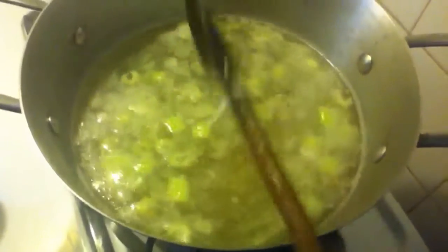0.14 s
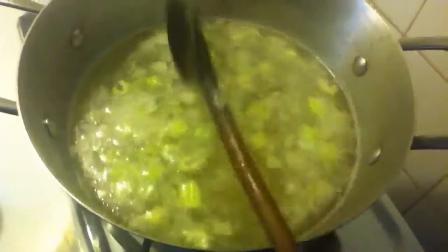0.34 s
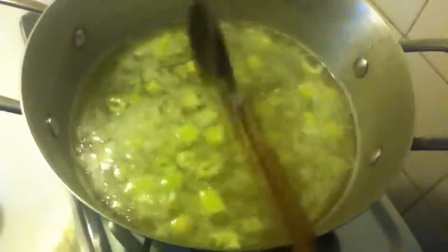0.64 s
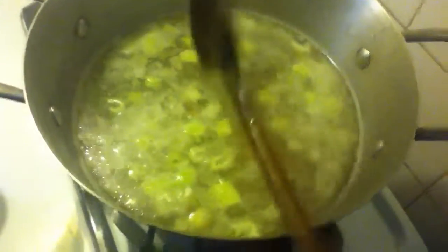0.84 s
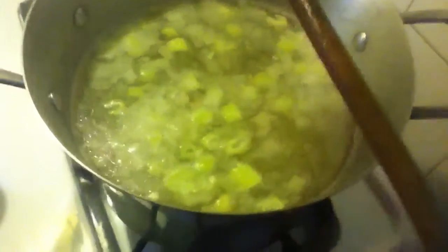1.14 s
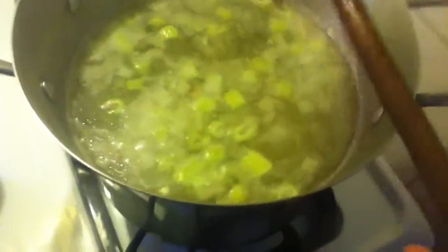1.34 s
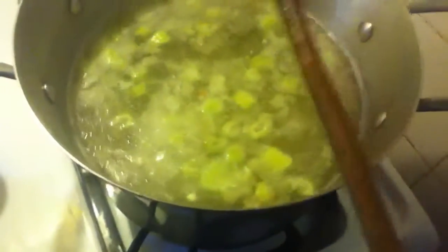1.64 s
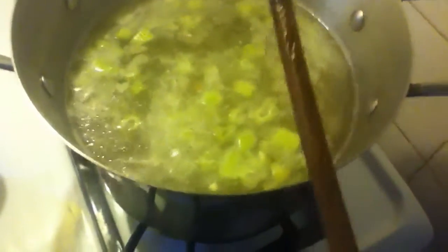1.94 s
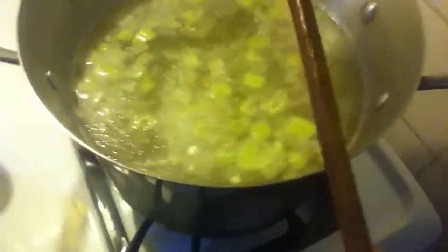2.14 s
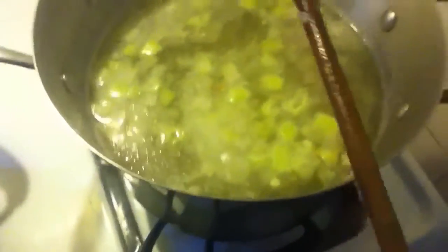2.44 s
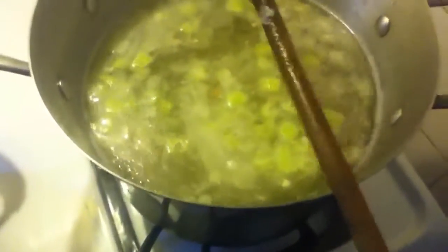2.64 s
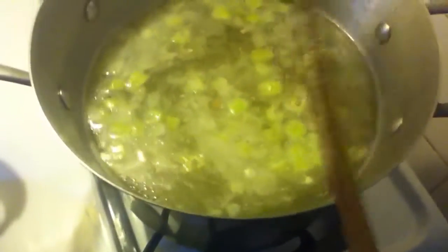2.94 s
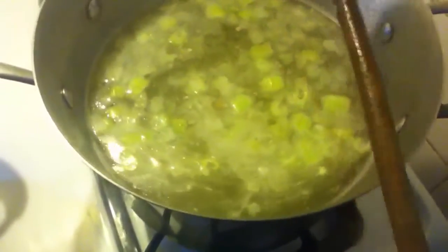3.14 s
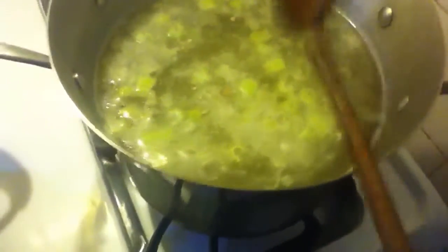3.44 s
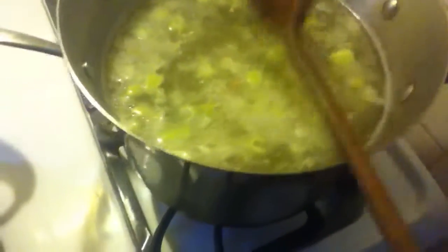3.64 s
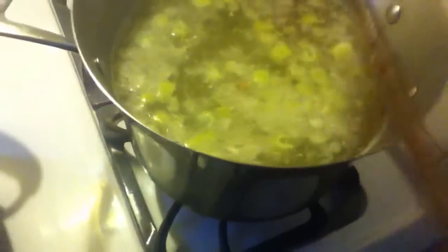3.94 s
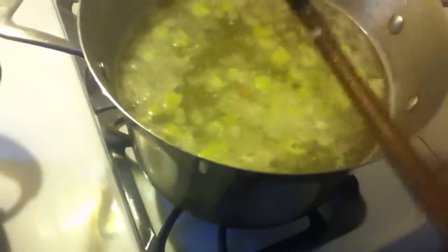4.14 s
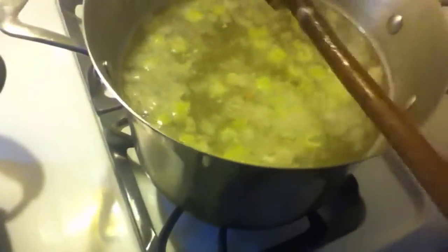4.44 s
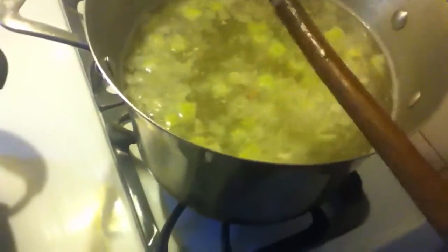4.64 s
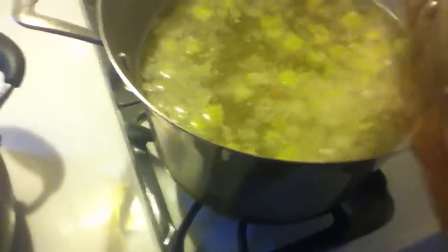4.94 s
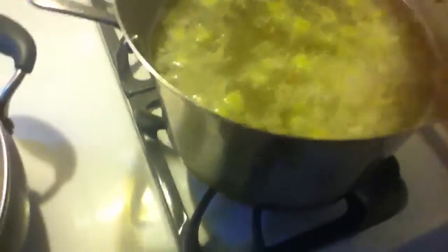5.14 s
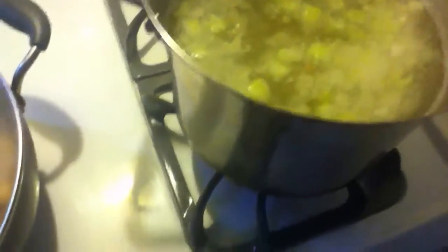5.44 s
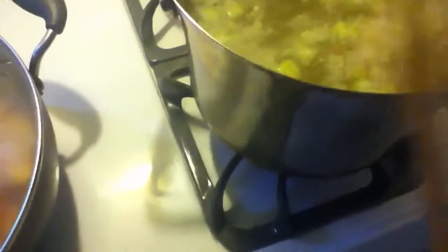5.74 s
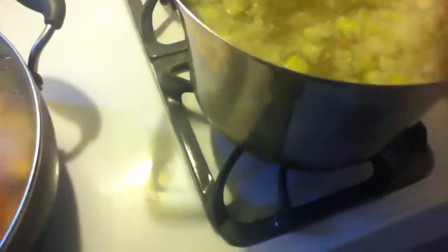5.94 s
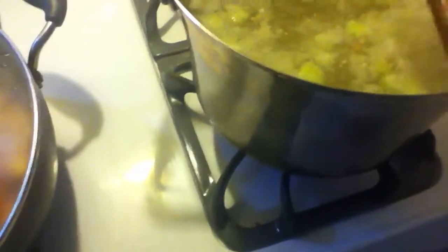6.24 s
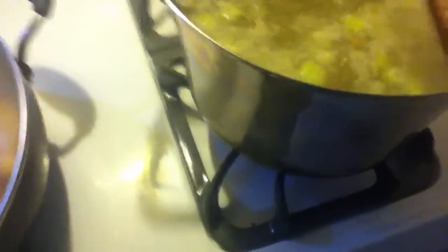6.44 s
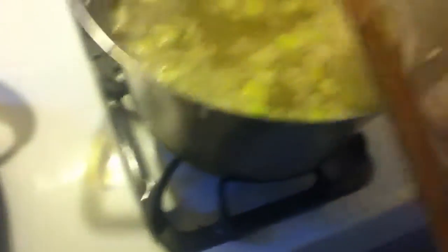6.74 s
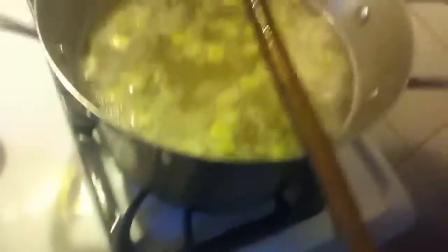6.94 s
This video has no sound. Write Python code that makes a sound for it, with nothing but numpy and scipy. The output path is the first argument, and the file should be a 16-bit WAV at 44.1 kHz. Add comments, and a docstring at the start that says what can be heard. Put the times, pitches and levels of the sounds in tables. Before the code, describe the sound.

A pot of thick soup simmers quietly throughout, a dense low bubbling with burner rush and fine fizz, heard very close in a small echoing kitchen. From about 0.2 to 1.0 seconds a wooden spoon raps the metal rim five times, evenly and hard: bright snap, woody clack, short damped clank, then shuddering grate and a deep stove boom. The third rattles most, the fourth is softer. The boil sags under the blows, then rebuilds; hollow plops come near 2.4 and 2.6 seconds, a tiny spit hiss at 3.2. Three more knocks land at 3.5, 3.7 and 3.9, the middle one rattling, with a light second touch after the last. Bubbling returns, with plops around 4.7 and 5.1. Four final knocks run from 5.6 to 6.2, starting weaker, brighter in ring, growing stronger, the third rattling. The boom fades into simmering and a plop near 6.5. Loud blows flatten with overload.

```python
"""A wooden spoon is knocked clean on the rim of a metal saucepan in three bursts: decaying modes ring the
soup-damped wall, noise bursts snap, clack, rattle and shudder, and narrow noise bands boom the stove top.
Thick soup simmers underneath: many gliding sine bubbles, a noise rush and fizz sag at each blow and rebuild.
Bigger bubbles plop, spits hiss and the pan rocks on its grate; a small kitchen adds diffuse echoes.
The microphone is close, and the blows overload it."""
import sys
import numpy as np
from scipy import signal
from scipy.fft import rfft, irfft
from scipy.io import wavfile
from scipy.ndimage import uniform_filter1d

SR = 44100
rng = np.random.default_rng(int(sys.argv[2]) if len(sys.argv) > 2 else 0)


def log_audio(samples):
    """Write samples as a 16-bit WAV file to the path given in sys.argv[1]."""
    # one column per channel
    frames = np.atleast_2d(samples).T
    # limit to full scale, then quantise
    limited = np.clip(frames, -1, 1)
    pcm = np.round(limited * 32767).astype(np.int16)
    wavfile.write(sys.argv[1], SR, pcm)


N = 313330
TIME = np.arange(N) / SR
RING = TIME[:SR]  # one second, the longest any single sound lasts


def undb(db):
    """Decibels to gain."""
    return 10 ** (np.asarray(db) / 20)


def unit(x):
    """Scale to a standard deviation of 1."""
    return x / np.std(x)


def fade(t60):
    """Exponential decay that falls 60 dB in t60 seconds, cut off at one second."""
    return np.exp(-np.log(1000) * RING / t60)


def add(track, s, sound):
    """Mix a sound in at time s."""
    i = max(int(s * SR), 0)
    track[i:i + len(sound)] += sound[:max(N - i, 0)]


def colour(x, points):
    """Causal minimum-phase filter through (f/Hz, level/dB) points; white noise keeps its power."""
    hz, db = np.transpose(points)
    size = 4096
    bins_hz = np.arange(size // 2 + 1) * SR / size
    gain = undb(np.interp(np.log(bins_hz + 1), np.log(hz), db))
    # folding the cepstrum to one side makes the response causal
    cepstrum = irfft(np.log(gain))[:size // 2]
    response = irfft(np.exp(rfft(np.r_[cepstrum[0], 2 * cepstrum[1:]], size)))
    return signal.fftconvolve(x, response / np.linalg.norm(response))[:len(x)]


def band(hz, width):
    """One second of noise gathered round a resonance, rms 1."""
    f = np.arange(SR // 2 + 1)
    noise = rfft(rng.standard_normal(SR))
    return unit(irfft(noise / (1 + ((f - hz) / width) ** 2) ** 1.66, SR))


def burst(t60, points):
    """A dense crowd of short modes: coloured noise that dies away."""
    return colour(rng.standard_normal(SR) * fade(t60), points)


def walk(rate):
    """A bounded random wander with a spread near 1, heading for a new value rate times a second."""
    step = int(SR / rate)
    targets = rng.uniform(-1.1, 1, N // step + 1)
    return 2 * uniform_filter1d(np.repeat(targets, step), step)[:N]


def sprinkle(per_s):
    """Random events: rows of (t/s, size 0-1, pitch 0-1)."""
    return rng.random((int(per_s * N / SR), 3)) * [N / SR, 1, 1]


# kitchen echoes by frequency: (f/Hz, level/dB, t60/s)
ROOM_DECAY = [(100, -12, 0.74), (300, 1, 0.62), (700, -4.5, 0.75), (1370, -8.5, 0.43), (2220, -16.5, 0.38),
              (4500, -11.5, 0.37), (8000, -14, 0.36), (15000, -19, 0.3)]


def kitchen_echoes(x, first_s=0.0088, build_s=0.003):
    """Diffuse echoes off hard walls: each frequency region of a noise response dies at its own rate."""
    hz, db, t60 = np.transpose(ROOM_DECAY)
    noise = rfft(rng.standard_normal(SR))
    log_hz = np.log(np.arange(len(noise)) + 1)
    onset = 1 - np.exp(-np.maximum(RING - first_s, 0) / build_s)
    response = 0
    for share, level_db, decay in zip(np.eye(len(hz)), db, t60):
        shape = onset * fade(decay)
        region = irfft(noise * np.interp(log_hz, np.log(hz), share), SR)
        response = response + undb(level_db) * region * shape / np.linalg.norm(shape)
    return signal.fftconvolve(x, response)[:len(x)]


REBUILD_S = 0.9  # time constant of the boil's return after a blow


def shaken(s):
    """How far the boil is knocked back at time s: 1 at a blow, easing to 0 as new bubbles grow."""
    return np.max([(s >= blow) * np.exp(-np.abs(s - blow) / REBUILD_S) for blow, *_ in BLOWS], axis=0)


# tone of simmer and burner: (f/Hz, relative level per Hz/dB)
SIMMER_TONE = [(15, -74), (25, -20), (123, -3), (175, -10.5), (285, -2.5), (326, -9.5), (531, -5.5),
               (962, -15), (1290, -11.5), (2690, -21), (7920, -25), (16000, -34)]
# resonances of the air in the pan above the soup: (f/Hz, width/Hz, gain/dB)
PAN_AIR = [(224, 21, 1.5), (291, 14, -2), (383, 14.5, 3.5), (544, 100, -6.5), (758, 31, 4), (880, 73, -5),
           (1140, 86, -4.5), (1677, 22, 4), (2280, 100, -6), (6020, 410, -6)]


def hollow(x):
    """The air in the pan adds its resonances to sounds from the soup; rms 1."""
    x = colour(x, SIMMER_TONE)
    air = 0
    for hz, width, db in PAN_AIR:
        air = air + undb(db) * signal.lfilter(*signal.iirpeak(hz, hz / width, fs=SR), x)
    return unit(x + air)


def bubble(hz, cycles, glide=0.15):
    """A bubble rings for some cycles, rising in pitch by the glide fraction as it opens."""
    age = np.linspace(0, 1, int(SR * cycles / hz) + 2)
    envelope = np.exp(-np.log(1000) * age) * (1 - np.exp(-age * cycles))
    return envelope * np.sin(2 * np.pi * cycles * age * (1 + glide * age / 2))


# undisturbed level of bubbling and fizz, and how far a blow makes each sag (dB)
BUBBLING_DB, FIZZ_DB = -45.5, -49.5
BUBBLING_SAG_DB, FIZZ_SAG_DB = 7, 8


def soup_bubbles(per_s=450, size_db=2.5):
    """Small bubbles open at random in the thick soup, each a short gliding ring."""
    out = np.zeros(N)
    for when, pitch, size, length in rng.random((int(per_s * N / SR), 4)):
        hz = 230 * 9 ** pitch
        size_gain = undb(size_db * min(-np.log(1 - size), 3.5))
        add(out, when * N / SR, bubble(hz, 6 + 14 * length) * hz * size_gain)
    return out


def wall_pops(per_s=900, pop_db=2.0):
    """Tiny bubbles pop along the hot wall as single random clicks."""
    size_gain = undb(pop_db * np.minimum(rng.exponential(size=N), 4))
    return (rng.random(N) < per_s / SR) * rng.standard_normal(N) * size_gain


def simmer(rush_db=10, crackle_db=-5, split_hz=2200, flutter_db=0.8, gurgle_db=1.7):
    """Bunched bubbles over the burner's noise rush below the split; pops and hiss fizz above it."""
    sag = shaken(TIME)
    boil_gain = undb(BUBBLING_DB - BUBBLING_SAG_DB * sag)
    fizz_gain = undb(FIZZ_DB - FIZZ_SAG_DB * sag) * undb(flutter_db * walk(25))
    bunches = undb(gurgle_db * walk(10))  # bubbles come up in bunches
    rush, hiss = rng.standard_normal((2, N))
    boil = unit(soup_bubbles() * bunches) + undb(rush_db) * rush
    fizz = undb(crackle_db) * unit(wall_pops()) + hiss
    low = signal.sosfilt(signal.butter(2, split_hz, fs=SR, output="sos"), boil)
    high = signal.sosfilt(signal.butter(2, split_hz, "high", fs=SR, output="sos"), fizz)
    return boil_gain * hollow(low) + fizz_gain * hollow(high)


# random spits: rate (per s), mid level before the sag (dB), middle pitch (Hz), length (s)
SPITS_PER_S, SPIT_DB, SPIT_HZ, SPIT_S = 3.8, -51.5, 6800, 0.029
# spits at set times: (t/s, level/dB, centre f/Hz, length/s)
SET_SPITS = [(1.474, -54, 9500, 0.032), (3.198, -47.5, 8000, 0.031)]


def spits(spread_db=6):
    """Drops of soup hiss away on the hot wall: noise bands that swell and vanish; random ones sag with blows."""
    out = np.zeros(N)
    scattered = []
    for s, size, pitch in sprinkle(SPITS_PER_S):
        db = SPIT_DB - FIZZ_SAG_DB * shaken(s) + spread_db * (size - .5)
        scattered.append((s, db, SPIT_HZ * 2 ** (pitch - .5), SPIT_S))
    for s, db, hz, length in SET_SPITS + scattered:
        swell = np.exp(-(2 * (RING - length) / length) ** 2)  # the peak falls at time s
        add(out, s - length, undb(db) * band(hz, hz / 2) * swell)
    return out


# random plops: rate (per s), mid level before the sag (dB)
PLOPS_PER_S, PLOP_DB = 5.4, -37
# their lowest pitch (Hz), range of pitch (octaves), cycles of ring
PLOP_LOW_HZ, PLOP_OCTAVES, PLOP_CYCLES = 322, 1.98, 16
# big bubbles bursting at set times: (t/s, level/dB, f/Hz, ring/cycles)
SET_PLOPS = [(2.391, -30.5, 1290, 50), (2.394, -28, 510, 8.7), (2.59, -35, 556, 39), (2.618, -33, 1050, 17),
             (3.293, -32.5, 515, 34), (4.735, -34, 1880, 31), (5.088, -30.5, 420, 14),
             (5.145, -29.5, 590, 9.6), (6.475, -33, 815, 20)]


def plops(plop_db=0, skin_db=-12, skin_t60=0.034, spread_db=6):
    """A big bubble tears its skin (noise) and its hollow rings (sine); random ones sag with blows."""
    out = np.zeros(N)
    scattered = []
    for s, size, pitch in sprinkle(PLOPS_PER_S):
        db = PLOP_DB - BUBBLING_SAG_DB * shaken(s) + spread_db * (size - .5)
        scattered.append((s, db, PLOP_LOW_HZ * 2 ** (PLOP_OCTAVES * pitch), PLOP_CYCLES))
    for s, db, hz, cycles in SET_PLOPS + scattered:
        add(out, s, undb(db + plop_db) * bubble(hz, cycles, glide=0.031))
        add(out, s, undb(db + skin_db) * band(hz, 3.0 * hz) * fade(skin_t60))
    return out


# time between landings of the rocking pan (s), mean loss per landing (dB)
ROCK_S, ROCK_LOSS_DB = .049, 2.5


def settles(thud_db=-36, thud_t60=0.13, tick_db=-43, tick_t60=0.12, uneven_db=3, count=3):
    """After each blow the pan rocks and lands a few times, softer on average, with a thud and a short tick in
    the wood's tone."""
    out = np.zeros(N)
    thud_tone = [(35, -15), (120, 1.0), (500, -21), (1300, -9.0), (4000, -46)]
    for s, db, _, boom_db, *_ in BLOWS:
        for k, chance in enumerate(rng.standard_normal(count)):
            thud = undb(thud_db + boom_db) * burst(thud_t60, thud_tone)
            tick = undb(tick_db) * burst(tick_t60, WOOD_TONE)
            landing_db = db - k * ROCK_LOSS_DB + uneven_db * chance
            add(out, s + (k + 1) * ROCK_S, undb(landing_db) * (thud + tick))
    return out


# lingering clusters of close modes in stove top and pan: (f/Hz, width/Hz, t60/s, relative level/dB)
STOVE_MODES = [(95, 41, 0.53, -40), (127.4, 23.5, 1.6, -38.5), (150, 12, 0.58, -44.5),
               (255, 38, 0.44, -43.5), (357, 21, 0.88, -44.5), (418, 50, 0.7, -38), (609, 8.3, 1.44, -50),
               (899, 31, 0.46, -36), (1063, 40, 0.58, -40), (2375, 27, 0.32, -35)]


def stove(swell_s=0.0025):
    """The stove top takes up a push through the grate and booms along with the pan; close modes beat."""
    boom = sum(undb(db) * band(hz, width) * fade(t60) for hz, width, t60, db in STOVE_MODES)
    return boom * (1 - np.exp(-RING / swell_s))


# tone of grate and burner parts shaken by a blow: (f/Hz, relative level per Hz/dB)
SHUDDER_TONE = [(35, -20), (130, -4), (195, -22), (400, 1), (490, -7), (600, 10), (1200, -1), (1500, 1),
                (2400, 2.5), (3200, -3), (6500, -17.5), (10000, -25), (16000, -36)]


def shudder(db=-26.0, t60=0.43):
    """Grate and burner parts shake as a dense noise burst."""
    return undb(db) * burst(t60, SHUDDER_TONE)


# tone of the pan base chattering on the grate: (f/Hz, relative level per Hz/dB)
CHATTER_TONE = [(50, -23), (200, 12), (1200, 7), (3000, 2.5), (6300, 6.5), (10000, 0), (12000, -13),
                (16000, -55)]


def skid(chatter_db, db=-25, delay_s=.014, t60=0.11):
    """The base skids on the grate just after the blow: a delayed rattle of noise."""
    silence = np.zeros(int(delay_s * SR))
    return undb(db + chatter_db) * np.r_[silence, burst(t60, CHATTER_TONE)][:SR]


# dull tone of the wood: (f/Hz, relative level per Hz/dB)
WOOD_TONE = [(30, -37), (60, -22), (120, 7), (300, 5.5), (490, -16), (800, -6), (2200, 2), (3200, -2),
             (6000, -4.5), (9000, -12), (12000, -26.5), (16000, -45)]


def clack(bright, db=-13.5, t60=0.064):
    """The wood's dull noise burst, its tone tilted about 2 kHz by the brightness in dB per octave."""
    tilted = [(f, level + bright * np.log2(f / 2000)) for f, level in WOOD_TONE]
    return undb(db) * burst(t60, tilted)


# light second touches of the spoon on the rim: (t/s, level/dB)
SECOND_TOUCHES = [(.737, -35), (3.9507, -19)]


def rebounds(t60=0.035):
    """A light second clack of the wood."""
    out = np.zeros(N)
    for s, db in SECOND_TOUCHES:
        add(out, s, undb(db) * burst(t60, WOOD_TONE))
    return out


def crack(db=-9, t60=0.0052):
    """The bright snap of hard wood meeting the rim: a very short noise burst."""
    tone = [(100, -19), (1500, 4.5), (5000, 1), (9000, -8.5), (12000, -17), (16000, -18)]
    return undb(db) * burst(t60, tone)


def ring(hz, t60, gain, phase):
    """Sum of decaying sine modes."""
    return sum(g * fade(d) * np.sin(2 * np.pi * f * RING + p) for f, d, g, p in zip(hz, t60, gain, phase))


# times when the spoon moves on to the next rim spot (t/s)
SPOT_MOVES = [2, 5]
# modes of the pan with the spoon on it, before detuning:
# (f/Hz, t60/s, then relative level/dB when struck at rim spot 0, at spot 1, at spot 2)
PAN_MODES = [(389, 0.054, -23.5, -25.5, -33), (545.6, 0.25, -29.5, -28, -28.5),
             (603, 0.052, -19.5, -24, -21), (801.6, 0.14, -23, -24, -20), (912, 0.024, -23, -22, -21),
             (1046, 0.23, -32, -26, -31), (1147, 0.099, -22.5, -27, -47), (1241, 0.12, -26, -42, -21),
             (1301, 0.029, -13, -3.5, -5.5), (1625, 0.038, -27, -17, -23), (1800, 0.017, -8, -14, -12),
             (1874, 0.11, -25, -41, -24), (2037, 0.067, -19.5, -45, -25), (2200, 0.045, -10.5, -13, -13.5),
             (2370, 0.12, -14, -30, -30), (2396, 0.056, -11.5, -19.5, -21.5),
             (2493, 0.049, -11, -17.5, -14.5), (2865, 0.034, -34, -16.5, -14),
             (3413, 0.027, -34, -23, -9.5), (3497, 0.048, -38, -30, -18), (4216, 0.017, -14.5, -17, -8.5),
             (4600, 0.041, -17.5, -21, -38), (4900, 0.034, -22, -20, -27), (5130, 0.021, -13, -23, -9.5),
             (5880, 0.068, -25, -31, -22), (6410, 0.079, -30, -26, -26), (6626, 0.024, -20, -25, -9.5),
             (7610, 0.02, -19, -42, -20), (9720, 0.031, -40, -25, -45)]


def pan_wall(s, bright, lift_hz, lift_db, wall_db=-0.17, scatter_db=1.24, detune=0.0067, spread_s=0.0014,
             lift_octaves=0.15, carry_db=-3):
    """The struck wall rings in modes set by the rim spot; returns the close sound and the share sent to the room."""
    hz, t60, *spots = np.transpose(PAN_MODES)
    level, pitch, phase = rng.standard_normal((3, len(hz)))
    spot_db = spots[np.searchsorted(SPOT_MOVES, s)]
    mode_db = spot_db + bright * np.log2(hz / 2000) + scatter_db * level + wall_db
    # the point of the handle that lands decides which modes are driven hardest
    lift = lift_db * np.exp(-(np.log2(hz / lift_hz) / lift_octaves) ** 2)
    # the ring builds up as the bending wave runs round the wall
    swell = 1 - np.exp(-RING / spread_s)
    mode_hz, phase = hz * (1 + detune * pitch), 2 * np.pi * phase
    near = swell * ring(mode_hz, t60, undb(mode_db + lift), phase)
    far = swell * ring(mode_hz, t60, undb(mode_db + carry_db), phase)
    return near, far


# blows: (t/s, strength level/dB, brightness/dB per octave, relative stove boom level/dB,
# relative rattle level/dB, wall region driven hardest f/Hz, lift of that region/dB)
BLOWS = [(0.2041, 0.5, 0, 2, -25, 2160, 1.5), (0.4254, -1.5, -1, 2.5, -26, 2000, 7),
         (0.6026, 1, 1.1, 1, 3, 2500, -1.5), (0.7885, -4.5, -.5, 4, -29, 2250, 4.5),
         (0.9716, 0, 1, 0.5, -7, 2410, 0.5), (3.4782, -1, 1.5, 0.5, -15, 2230, 7.5),
         (3.6823, -1.5, 3.5, 1.5, 8, 2220, 7.5), (3.8993, -2, 0.95, 4, -20, 1280, -0.5),
         (5.6285, -5, 0.7, -2, -22, 3620, 10), (5.8259, -3, 1, -4, -18, 3400, 6),
         (5.9899, -2.5, 1.6, -0.5, 6, 5140, 2), (6.1725, -0.5, 2, -1, -39, 2370, 2)]


def knocks():
    """Each blow cracks, clacks and rings the wall, then shakes grate and stove; each burst meets its own rim spot."""
    out = np.zeros(N)
    for s, db, bright, boom_db, chatter_db, lift_hz, lift_db in BLOWS:
        near, far = pan_wall(s, bright, lift_hz, lift_db)
        contact = clack(bright) + skid(chatter_db)
        echoes = kitchen_echoes(far + contact)
        shaking = shudder() + undb(boom_db) * stove()
        add(out, s, undb(db) * (crack() + near + contact + echoes + shaking))
    return out


def scene():
    """Blows and their echoes over the simmering soup."""
    pan_events = settles() + rebounds() + plops()
    return (simmer() + spits() + pan_events + kitchen_echoes(pan_events) + knocks())[None]


CEILING = .72  # level the overloaded microphone flattens towards, before the treble filters
TOP_HZ = 15900


def record(dry, low_hz=22, treble_hz=13500):
    """The microphone loses deep bass, flattens the loudest peaks and softens the treble; the top is cut."""
    out = signal.sosfilt(signal.butter(1, low_hz, "high", fs=SR, output="sos"), dry)
    out = out / (1 + (out / CEILING) ** 4) ** .25
    out = signal.sosfilt(signal.butter(1, min(treble_hz, .45 * SR), fs=SR, output="sos"), out)
    return signal.sosfilt(signal.ellip(8, .2, 70, TOP_HZ, fs=SR, output="sos"), out)


dry = scene()
out = record(dry)
log_audio(out)
```